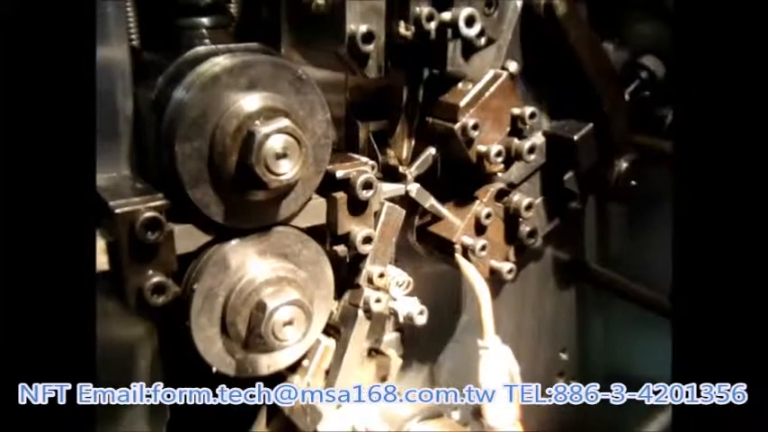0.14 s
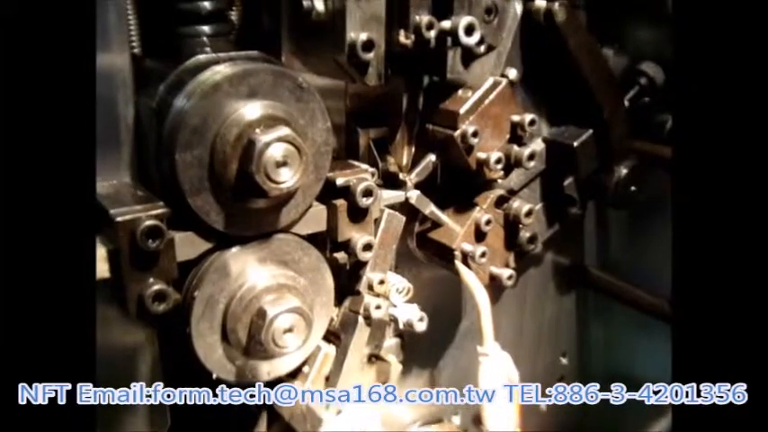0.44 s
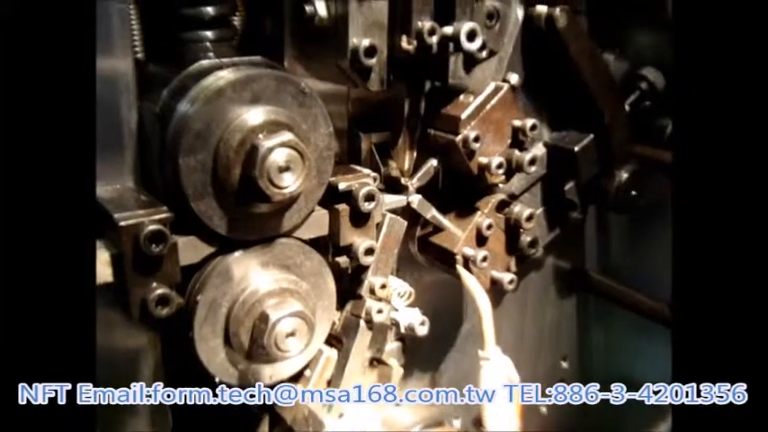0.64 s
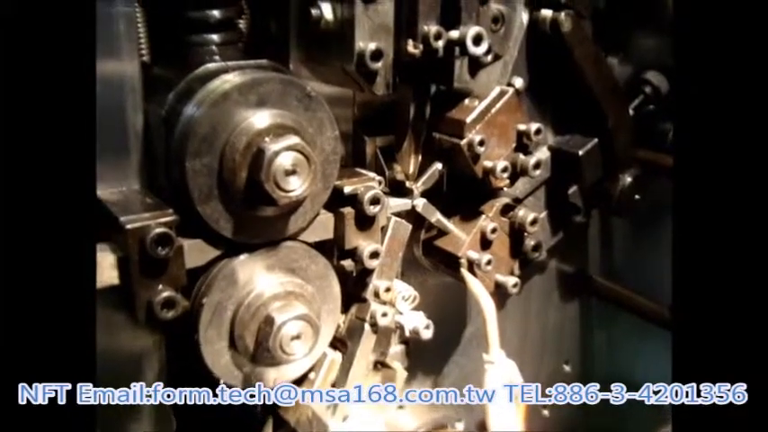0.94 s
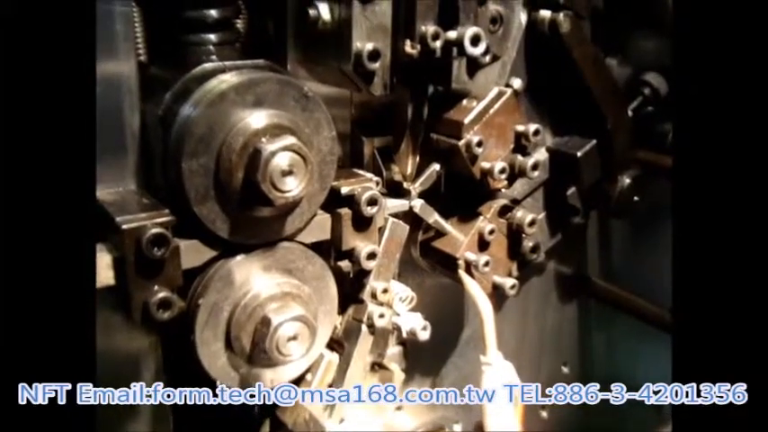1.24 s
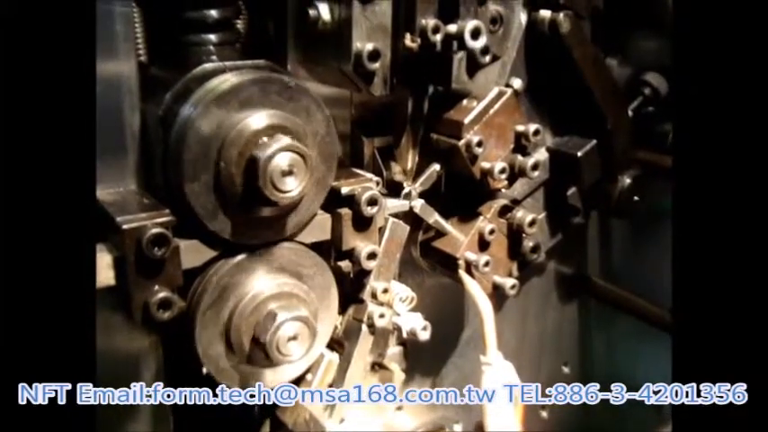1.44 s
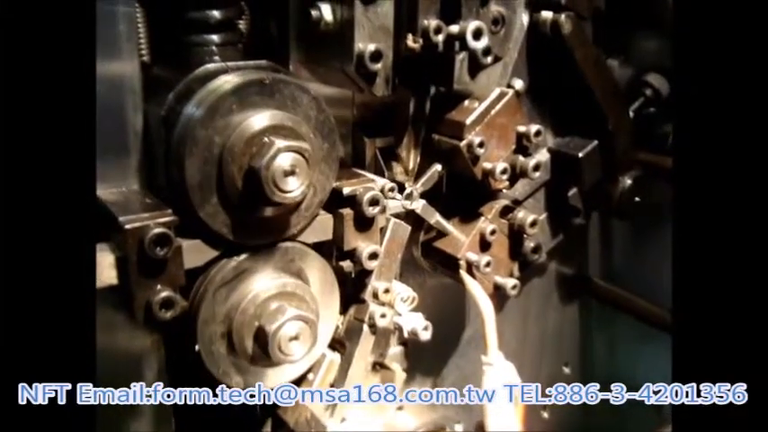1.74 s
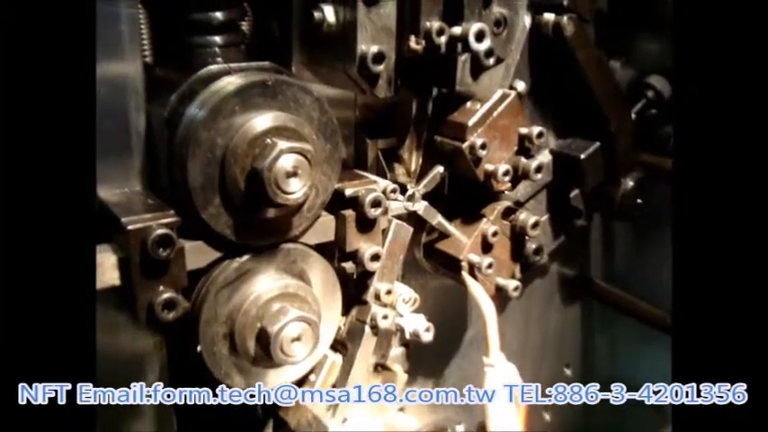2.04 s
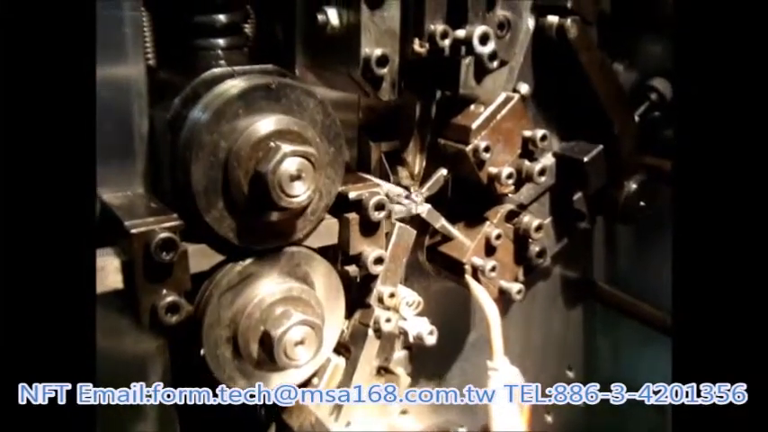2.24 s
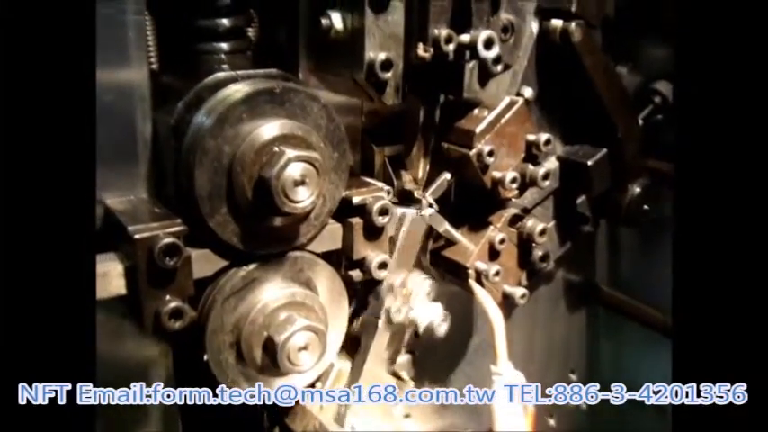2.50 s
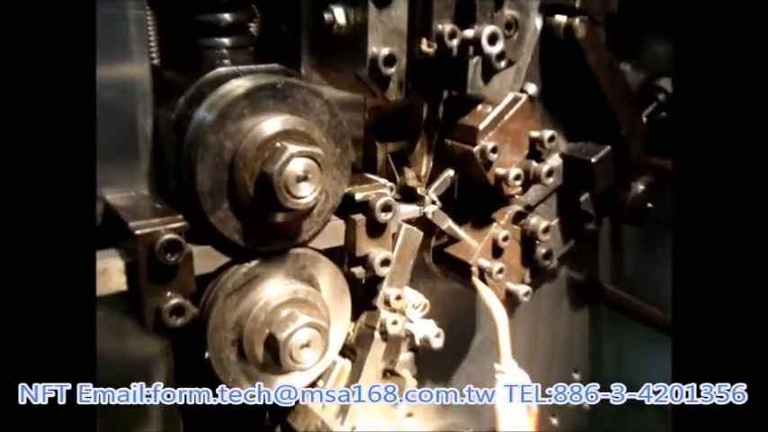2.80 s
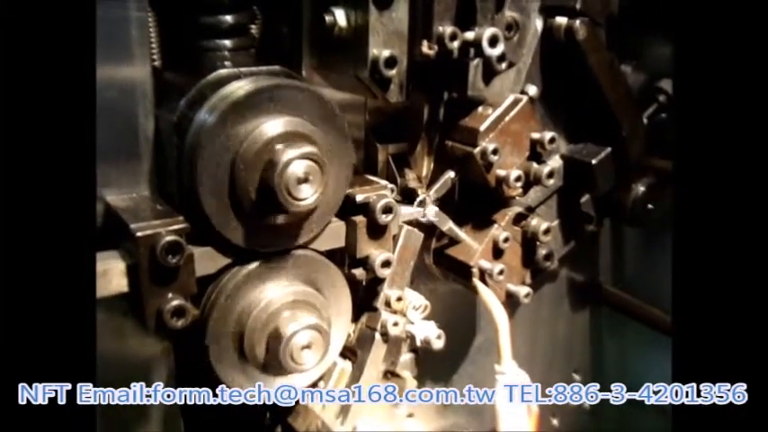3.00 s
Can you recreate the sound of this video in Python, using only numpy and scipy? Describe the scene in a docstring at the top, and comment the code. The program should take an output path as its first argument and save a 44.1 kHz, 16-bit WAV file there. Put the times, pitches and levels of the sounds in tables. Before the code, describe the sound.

A spring coiling machine runs close up in a workshop, its wire hissing, whining and ticking over a steady drone. A tool snaps into place with a thud and squeak, then the cutter shears with a ringing clatter.

```python
"""Wire running through a spring coiling machine, one microphone close up in a workshop. The wire hisses,
whines and ticks over the coiling tools while the drive drones and shakes the frame. A tool snaps into
place with a thud and a squeak; then the cutter shears the spring off with a ringing clatter, the drive
hums and the hiss swells again. The room answers each blow briefly."""
import sys
import numpy as np
from scipy import signal
from scipy.fft import rfft, irfft, next_fast_len
from scipy.io import wavfile
from scipy.ndimage import map_coordinates

SR = 44100
rng = np.random.default_rng(int(sys.argv[2]) if len(sys.argv) > 2 else 0)


def log_audio(samples):
    """Write samples as a 16-bit WAV file to the path given in sys.argv[1]."""
    # one column per channel
    frames = np.atleast_2d(samples).T
    # limit to full scale, then quantise
    limited = np.clip(frames, -1, 1)
    pcm = np.round(limited * 32767).astype(np.int16)
    wavfile.write(sys.argv[1], SR, pcm)


N = 139356


def wire():
    """Wire dragged over the tools: grainy hiss, rattle, a gliding scrape, squeals and ringing guides."""
    # loudness of the running wire: time_s, hiss_db, rattle_db
    feed = [(0, -17.5, -26.5), (.27, -16.5, -26), (.45, -20.5, -28.5), (.7, -28, -31), (.95, -25.5, -40.5),
            (1.35, -24.5, -25.5), (1.62, -24.5, -24.5), (2.05, -25, -25), (2.38, -22, -25.5),
            (2.56, -23, -20), (2.68, -20, -27), (2.9, -17.5, -23.5), (3.16, -13.5, -17.5)]
    # spectra of the hiss and the mid-range rattle: frequency_hz, density_db
    hiss_spectrum = [(100, -36), (1500, -23), (2800, -1), (4000, -2), (4600, -2), (6500, -2), (8200, -4),
                     (9800, -8.5)]
    rattle_spectrum = [(100, -28), (600, -15), (1100, -6), (1700, -4.5), (2350, 3.5), (3000, -2.5),
                       (3900, -2.5), (4700, -28.5), (10000, -13.5)]
    # glide of the scrape: time_s, pitch_hz, level_db
    glide = [(0, 4190, -29), (.3, 4150, -29), (.5, 3960, -28), (.68, 3890, -28), (.9, 3637, -30.5),
             (1.6, 3660, -37.5), (1.8, 3990, -31), (2.08, 4120, -33.5), (2.35, 4190, -30), (2.5, 4100, -40),
             (2.8, 3920, -53), (3.16, 3930, -29)]
    # stick-slip squeals: start_s, length_s, pitch_hz, level_db
    slips = [(.16, 0.16, 4070, -25.5), (0.917, 0.11, 3496, -30), (1.075, 0.24, 3575, -30),
             (1.247, .65, 3585, -28.5), (2.306, .03, 4105, -25.5)]
    hiss_db, rattle_db = curves(feed)
    hiss = amp(hiss_db + 1.2 * wobble(380) + .45 * wobble(36)) * noise(hiss_spectrum)
    rattle = amp(rattle_db + .9 * wobble(250) + .59 * wobble(35)) * noise(rattle_spectrum)
    scrape_hz, scrape_db = curves(glide)
    smear = unit(wobble(340) + .23 * wobble(680))  # spreads the tone into a narrow band
    scrape = amp(scrape_db) * smear * tone(scrape_hz + 90 * wobble(400))
    squeals = np.zeros(N)
    for start_s, length_s, hz, db in slips:
        chatter = unit(amp(wobble(80)))
        squeals += amp(db) * burst(start_s, length_s) * chatter * tone(hz + 23.9 * wobble(120))
    guides = amp(-38) * shaken([(6630, 340, .77), (7440, 170, -2.8)])
    return hiss + rattle + scrape + squeals + guides


def blows():
    """Steel on steel: a dense crash with a bright snap, the ring of tool and blade, and one low push."""
    # tool and cutter blows: start_s, crash_db, snap_db, t60_s, tool_db, blade_db, thump_db
    strikes = [(1.681, -7, -14, 0.11, -13, -27, -17), (1.693, -9, -27, 0.044, -12.5, -46, -21),
               (2.4225, -13, -8, 0.13, -30, -36, -15.5), (2.433, -8, -14, 0.25, -31, -13, -34),
               (2.444, -11, -14, 0.18, -36, -25, -38), (2.468, -12.5, -23, 0.1097, -24, -19, -38),
               (2.482, -25, -26, 0.051, -33, -9.5, -38), (2.5225, -9.5, -9, .06, -33, -15.5, -37)]
    # spectra of the crash and the snap: frequency_hz, density_db
    crash_spectrum = [(60, -27), (400, -9), (1050, -2.5), (1500, -1), (2200, 2), (3500, -1.5), (4800, -6),
                      (6700, -5), (9800, -11.5)]
    snap_spectrum = [(1000, -32), (3500, -10), (6500, 0), (9800, -6)]
    # modes of the tool and the cutter blade: pitch_hz, relative_db, t60_s
    tool_modes = [(567, -8, .15), (963, -8.5, .25), (1100, 2.5, 0.079), (1160, -7, 0.063), (2190, -3, .06),
                  (2370, -8, .06), (3143, -11.5, 0.099), (4123, 4, 0.069)]
    blade_modes = [(822, -8, 0.28), (1210, -10.5, 0.38), (2010, -6, 0.11), (2046, 2.5, 0.1),
                   (2155, -14, 0.088), (2642, -10.5, .17), (3134, -13, 0.15), (3370, -9, 0.13)]
    out = np.zeros(N)
    for start_s, crash_db, snap_db, t60_s, tool_db, blade_db, thump_db in strikes:
        crash = amp(crash_db) * noise(crash_spectrum)
        snap = amp(snap_db) * noise(snap_spectrum)
        out += decay(start_s, t60_s) * (crash + snap)
        out += amp(tool_db) * ring(tool_modes, start_s) + amp(blade_db) * ring(blade_modes, start_s)
        age = np.maximum(np.arange(N) / SR - start_s, 0) / .005  # the push swings back after 5 ms
        out += amp(thump_db) * (age > 0) * (1 - age) * np.exp(-age)
    return out


def slide():
    """The tool slide seats: the frame booms and sways, and the steel squeaks."""
    # squeaks of the sliding tool: start_s, length_s, level_db
    squeaks = [(1.7073, 0.011, -11.5), (1.716, .008, -16), (1.726, 0.0055, -18.5)]
    seat_s, rise_s, t60_s = 1.686, .023, .19
    thud_hz, sway_hz, squeak_hz = 211.4, 38, 5200
    age_s = np.arange(N) / SR - seat_s
    swell = np.clip(age_s / rise_s, 0, 1) * amp(-60 * np.maximum(age_s - rise_s, 0) / t60_s)
    thud = amp(-7.5) * swell * np.sin(2 * np.pi * thud_hz * age_s)
    sway = amp(-24) * decay(seat_s, t60_s) * np.sin(2 * np.pi * sway_hz * age_s)
    grip = sum(amp(db) * burst(start_s, length_s) for start_s, length_s, db in squeaks)
    return thud + sway + grip * tone(squeak_hz + 50 * wobble(300))


def ticks():
    """The growing coil taps against the tools."""
    # light taps: start_s, level_db, pitch_hz
    taps = [(0.6437, -18, 3850), (1.489, -16.5, 3900), (1.6162, -15, 4500), (1.624, -23, 6200),
            (2.2702, -20, 3400)]
    return sum(amp(db) * decay(start_s, t60_s=.06) * shaken([(hz, 700, 0)]) for start_s, db, hz in taps)


def drive():
    """Gears drone and feed rollers shake the frame; thin tones run on, and a hum follows the cut."""
    # loudness of the drone and the frame: time_s, level_db
    drone_level = [(0, -24), (.6, -24.5), (1.2, -25), (1.65, -24), (2.1, -24), (2.35, -22), (2.5, -21.5),
                   (2.7, -25), (2.95, -21.5), (3.16, -23)]
    frame_level = [(0, -28), (.65, -27), (1.55, -25.5), (1.9, -26.5), (2.38, -28.5), (2.55, -30),
                   (2.8, -39), (2.97, -27), (3.16, -42)]
    # spectrum of the drone: frequency_hz, density_db
    drone_spectrum = [(20, -20), (60, -25.5), (110, -15.5), (160, -9.5), (270, -5.5), (450, 0), (780, -0.5),
                      (1050, -5.5), (1600, -6), (3000, -14.5), (10000, -36.5)]
    # frame resonances: centre_hz, width_hz, relative_db
    frame_modes = [(196, 28.3, -1.5), (531, 18, -1.5), (559, 45, -0.5), (1529, 18, -11), (2260, 30, -29.5),
                   (2963, 46, -11)]
    # thin running tones and partials of the hum: pitch_hz, level_db
    thin_tones = [(1529, -45), (7822, -60)]
    hum_partials = [(414.5, -29.5), (726, -36.5), (1206, -42), (1926, -37), (2643, -38)]
    on_s, off_s, fade_s = 2.55, 3.02, .063
    t = np.arange(N) / SR
    drone = amp(curves(drone_level)[0] + .8 * wobble(29.85)) * noise(drone_spectrum)
    frame = amp(curves(frame_level)[0]) * shaken(frame_modes)
    whine = sum(amp(db + 6.5 * wobble(5.1)) * tone(hz + 6 * wobble(39.92)) for hz, db in thin_tones)
    hum = sum(amp(db + .92 * wobble(12)) * tone(hz + 2.52 * wobble(29.6)) for hz, db in hum_partials)
    hum_gate = np.clip((t - on_s) / fade_s, 0, 1) * np.clip((off_s - t) / fade_s + 1, 0, 1)
    return drone + frame + whine + hum_gate * hum


def cam():
    """The cam gear growls under load: just before the cut, then as the feed starts."""
    # swells of load: peak_s, half_width_s, level_db
    loads = [(2.38, 0.037, -19), (3.08, 0.067, -27.5)]
    # cam gear resonances: centre_hz, width_hz, relative_db
    gear_modes = [(100, 29, -9.5), (198, 80, -5), (456, 83, -3.5), (604, 130, -2), (840, 170, -5)]
    t = np.arange(N) / SR
    load = sum(amp(db) * np.exp(-.5 * ((t - peak_s) / half_s) ** 2) for peak_s, half_s, db in loads)
    return load * shaken(gear_modes)


def workshop(hits, level_db=-16.5, t60_s=.14):
    """The room answers the hits with a short, diffuse tail."""
    t = np.arange(SR // 2) / SR
    tail = rng.standard_normal(len(t)) * amp(-60 * t / t60_s)
    return amp(level_db) * signal.fftconvolve(hits, tail / np.linalg.norm(tail))[:N]


def ring(modes, start_s, rise_s=.0013):
    """Struck steel: each mode decays from a fresh strength, its phase slightly unsteady."""
    t, out = np.arange(SR // 2) / SR, np.zeros(N + SR)
    rise = 1 - np.exp(-t / rise_s)
    for hz, db, t60_s in modes:
        drift = .83 * np.cumsum(rng.standard_normal(len(t))) / np.sqrt(SR / 100)
        envelope = amp(db + rng.normal(0, 2.3) - 60 * t / t60_s) * rise
        out[round(start_s * SR):][:len(t)] += envelope * np.sin(2 * np.pi * hz * t + drift)
    return out[:N]


def shaken(modes):
    """Randomly excited resonances, rms 1, from rows of centre_hz, width_hz, relative_db."""
    def response(hz):
        return sum((-1) ** k * amp(db) * 1j * hz * width / (centre ** 2 - hz ** 2 + 1j * hz * width)
                   for k, (centre, width, db) in enumerate(modes))
    return unit(filtered(rng.standard_normal(N), response))


def noise(spectrum):
    """Noise of rms 1 coloured by rows of frequency_hz, density_db."""
    points_hz, db = np.transpose(spectrum)
    white = rng.standard_normal(N)
    return unit(filtered(white, lambda hz: amp(np.interp(np.log(hz + 1), np.log(points_hz), db))))


def tone(hz):
    """A sine of rms 1 that follows a pitch curve."""
    return np.sqrt(2) * np.sin(2 * np.pi * (np.cumsum(hz) / SR + rng.random()))


def decay(start_s, t60_s, attack_s=.00013):
    """Envelope of a blow: a sharp rise and an exponential fall."""
    t = np.maximum(np.arange(N) / SR - start_s, 0)
    return amp(-60 * np.minimum(t / t60_s, 5)) * (1 - np.exp(-t / attack_s))


def burst(start_s, length_s):
    """Envelope of one rounded swell."""
    progress = np.clip((np.arange(N) / SR - start_s) / length_s, 0, 1)
    return np.sqrt(np.abs(np.sin(np.pi * progress)))


def wobble(rate_hz):
    """A smooth random curve with rate_hz knots a second."""
    return map_coordinates(rng.standard_normal(N // 4), [np.arange(N) * rate_hz / SR + 3], mode="wrap")


def curves(rows):
    """One value per sample for each column after the time."""
    time_s, *columns = np.transpose(rows)
    return [np.interp(np.arange(N) / SR, time_s, column) for column in columns]


def filtered(x, response):
    """x shaped by a frequency response."""
    size = next_fast_len(N + 8192)
    return irfft(rfft(x, size) * response(np.fft.rfftfreq(size, 1 / SR)), size)[..., :N]


def amp(db):
    """Decibels to gain."""
    return 10 ** (np.asarray(db) / 20)


def unit(x):
    """Scaled to rms 1."""
    return x / np.sqrt(np.mean(x ** 2) + 1e-20)


def scene():
    """The machine close up with a little of the workshop, the same in both channels."""
    hits = blows() + slide() + ticks()
    room = workshop(hits)
    return np.tile(drive() + cam() + wire() + hits + room, (2, 1))


def record(dry):
    """The microphone chain rounds off the peaks and cuts the highest treble."""
    ceiling, top_hz = 1.05, 10050
    rounded = dry / (1 + np.abs(dry / ceiling) ** 4) ** (1 / 4)
    return filtered(rounded, lambda hz: np.clip((top_hz - hz) / 200 + .5, 0, 1))


dry = scene()
out = record(dry)
log_audio(out)
```